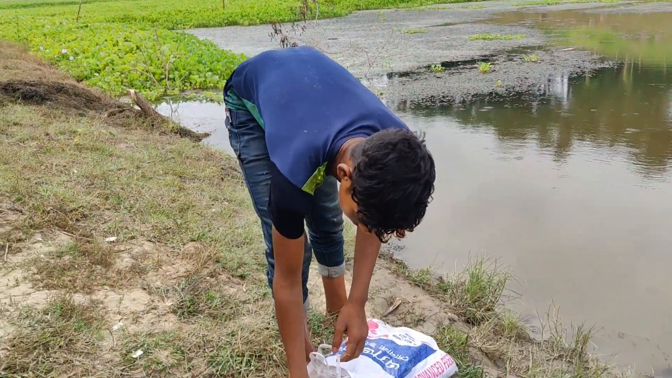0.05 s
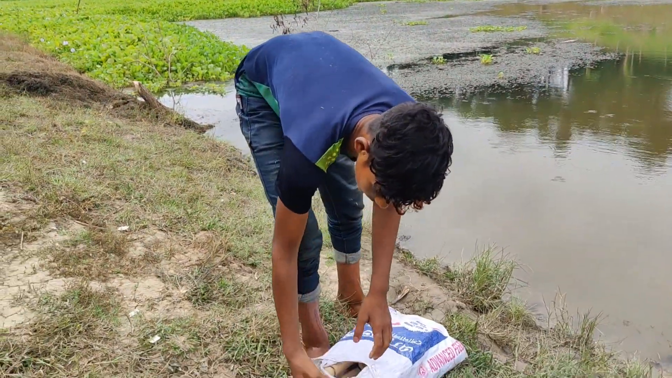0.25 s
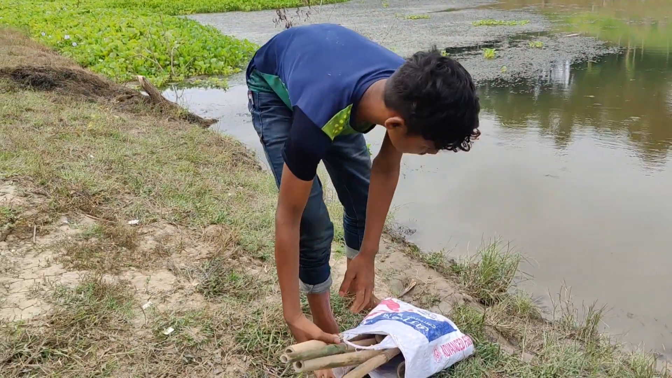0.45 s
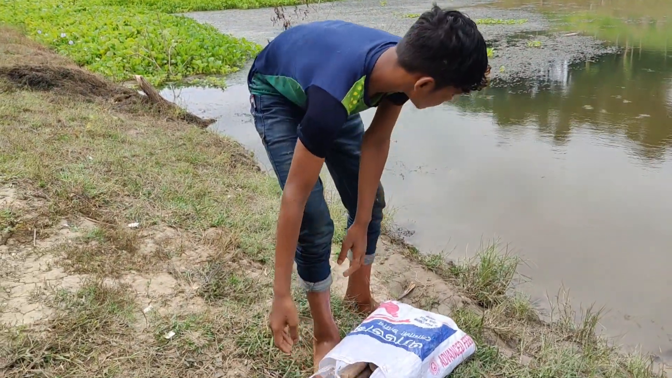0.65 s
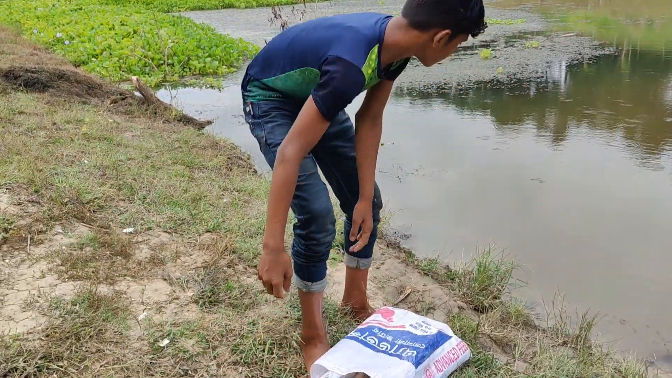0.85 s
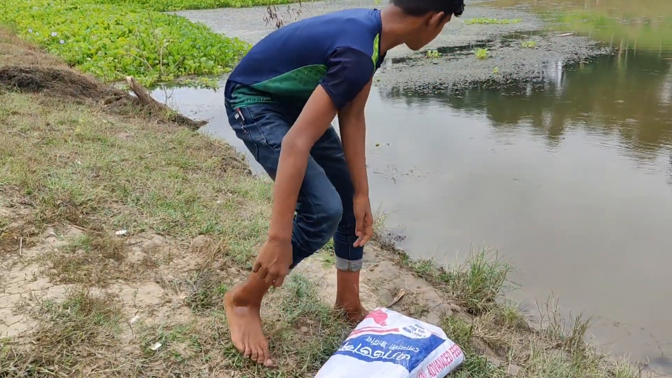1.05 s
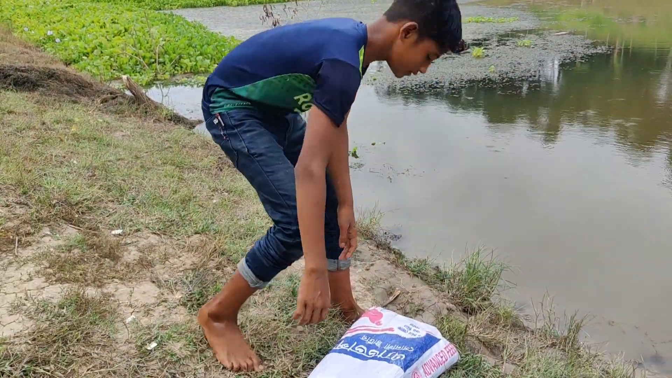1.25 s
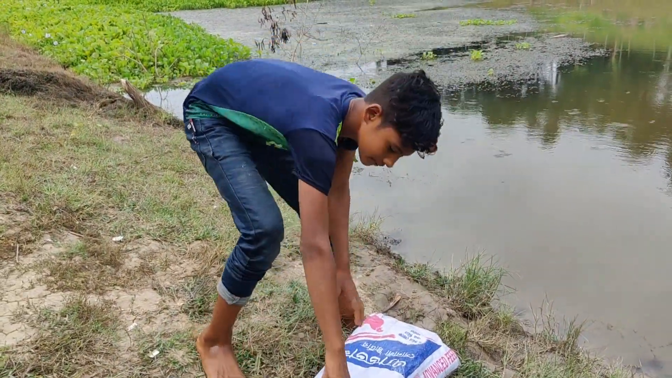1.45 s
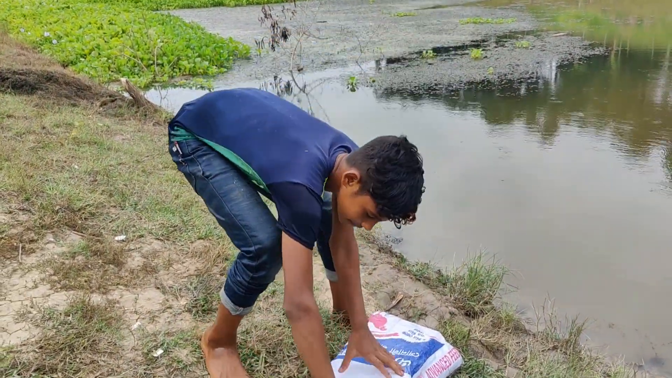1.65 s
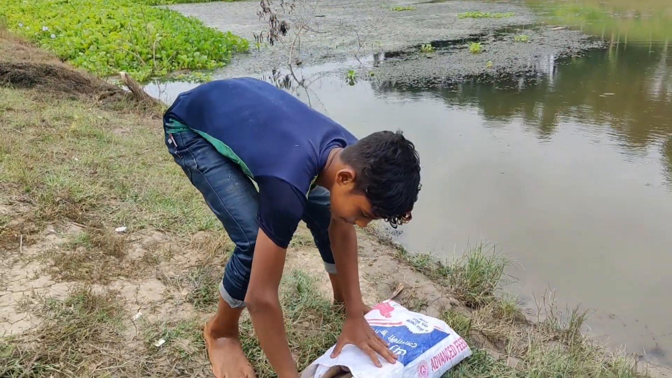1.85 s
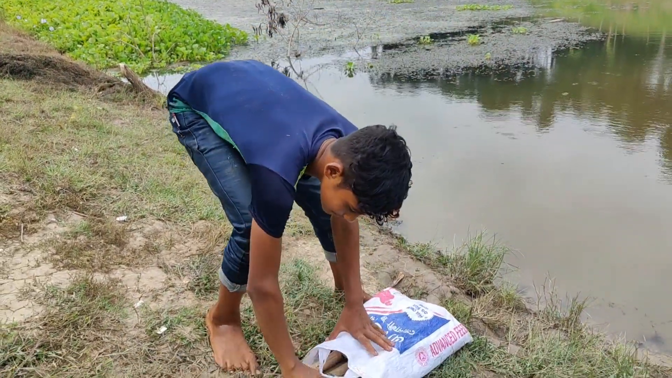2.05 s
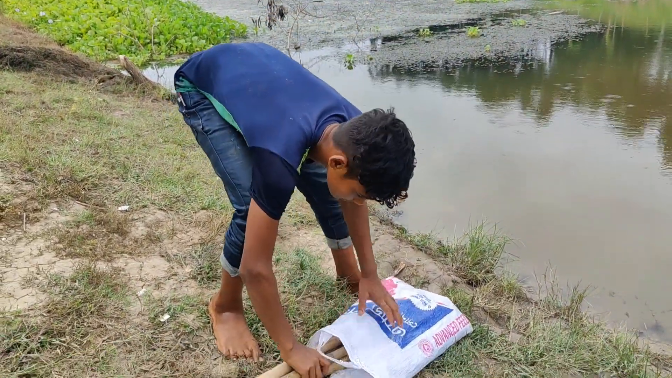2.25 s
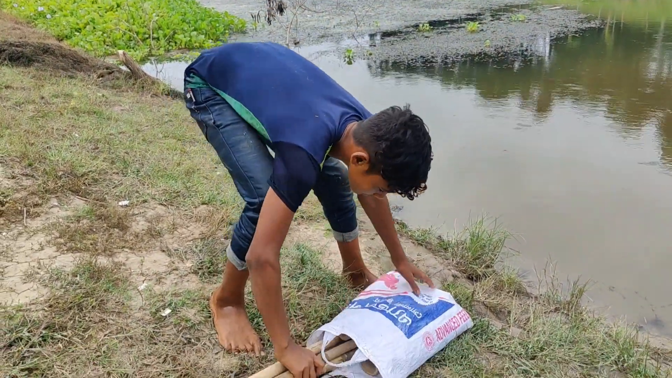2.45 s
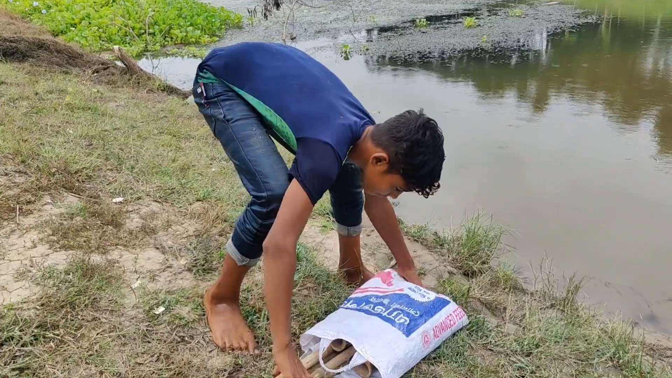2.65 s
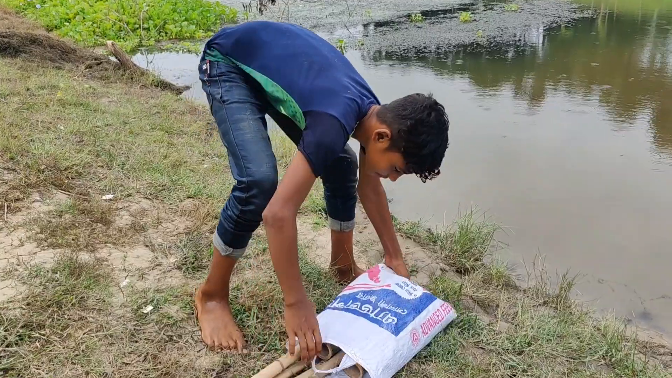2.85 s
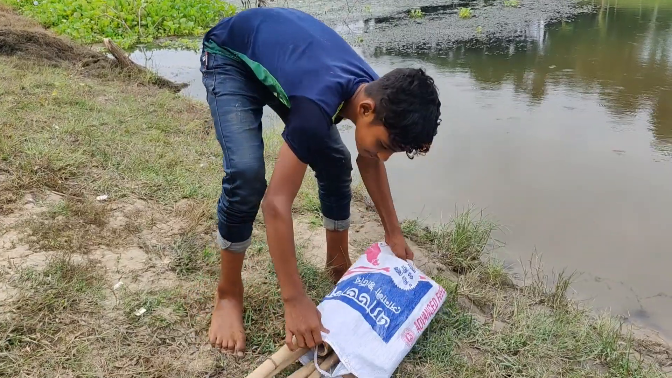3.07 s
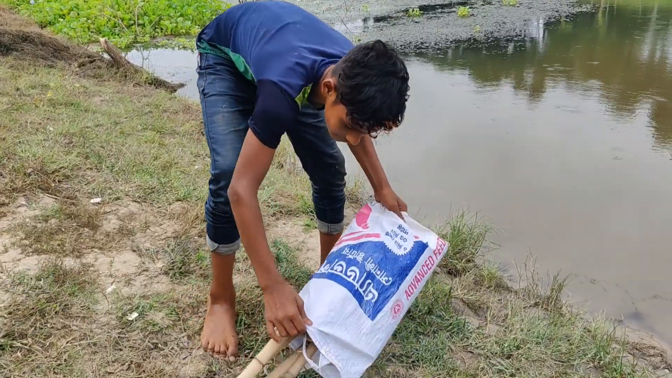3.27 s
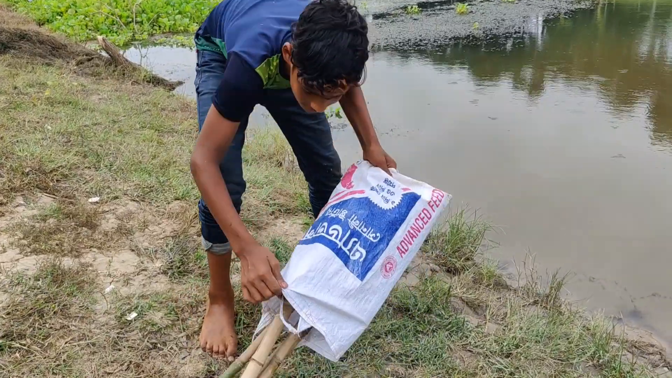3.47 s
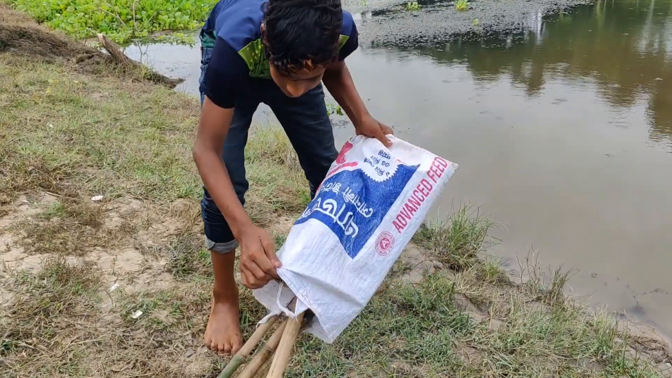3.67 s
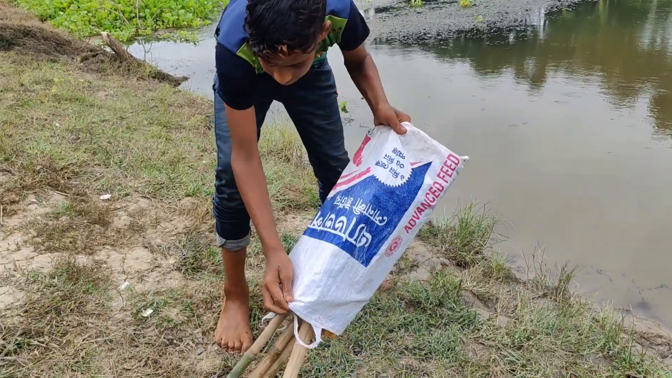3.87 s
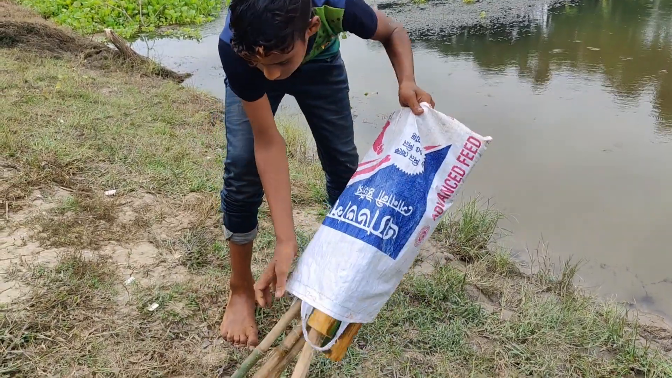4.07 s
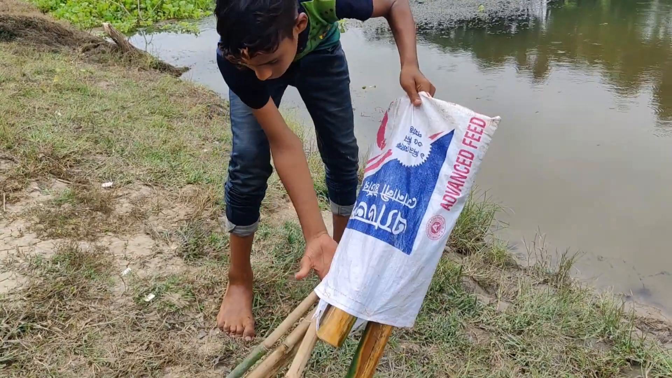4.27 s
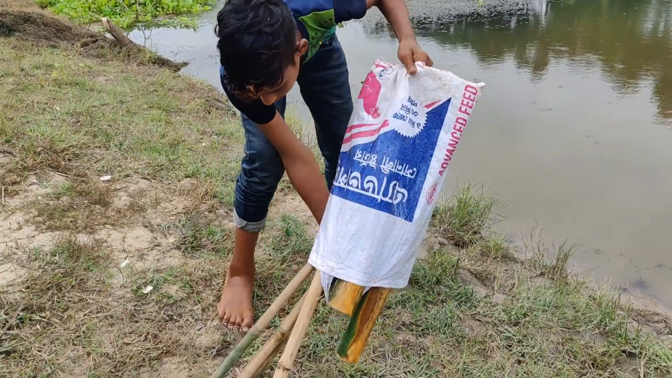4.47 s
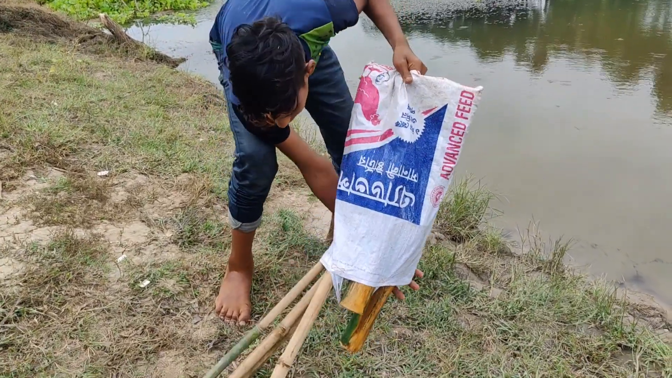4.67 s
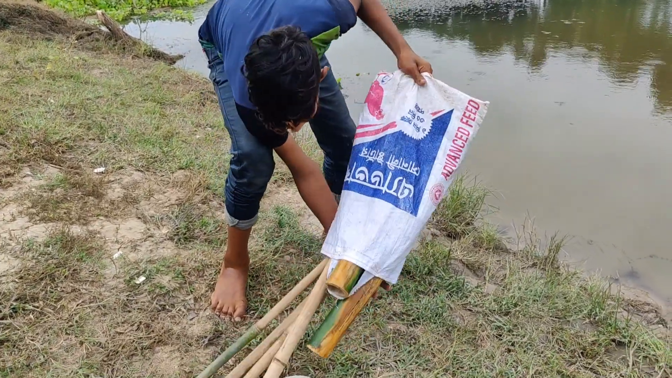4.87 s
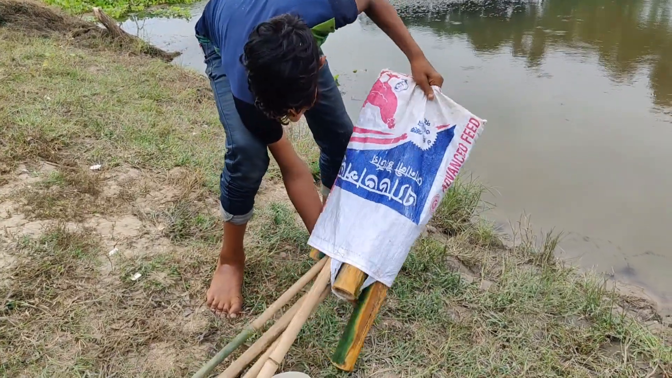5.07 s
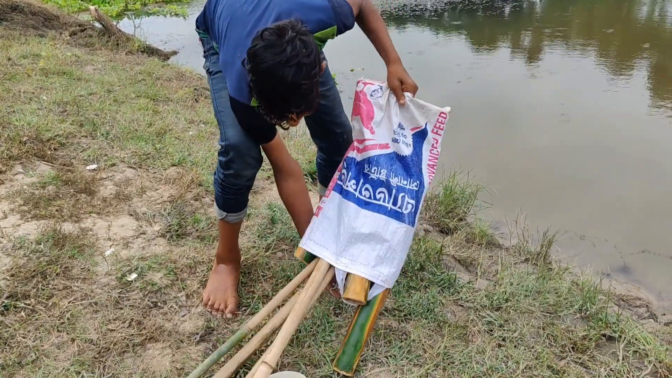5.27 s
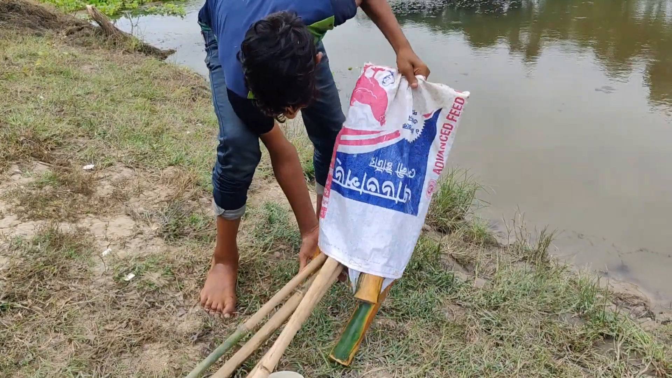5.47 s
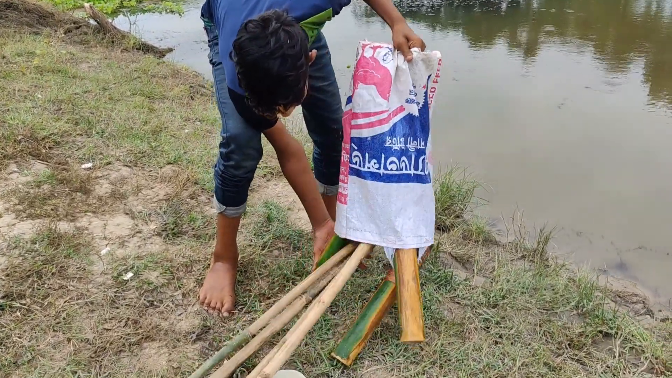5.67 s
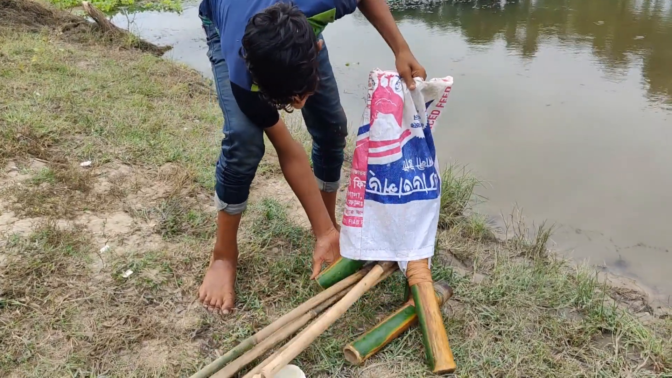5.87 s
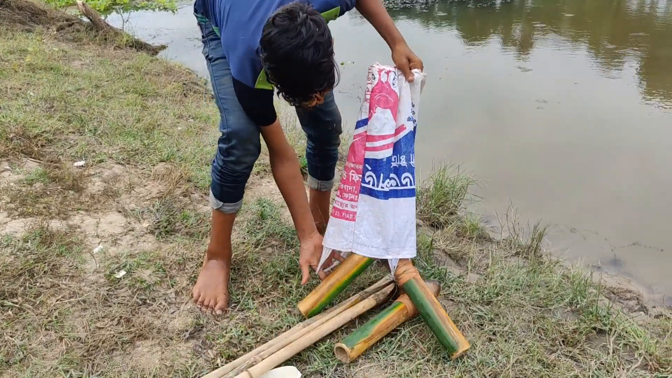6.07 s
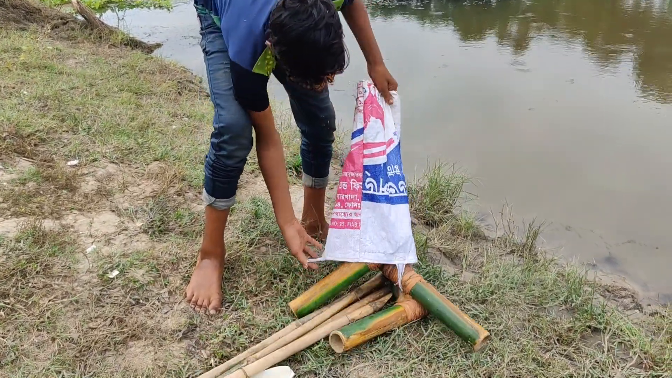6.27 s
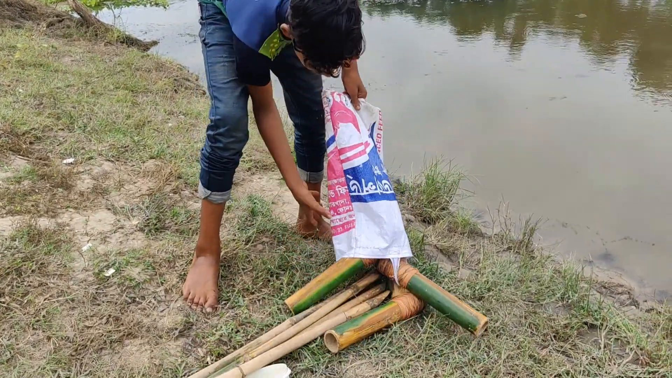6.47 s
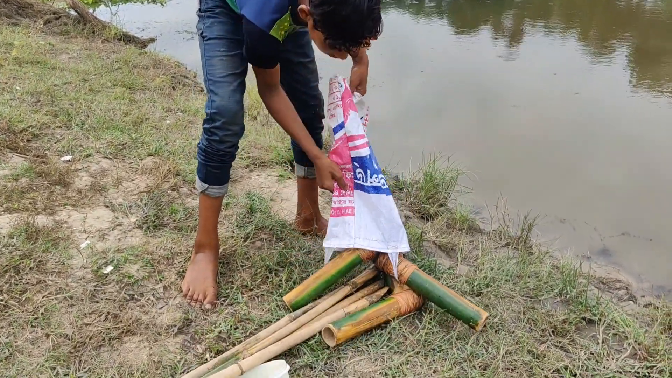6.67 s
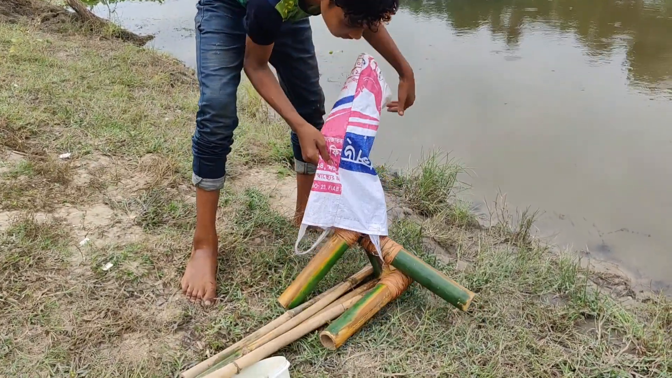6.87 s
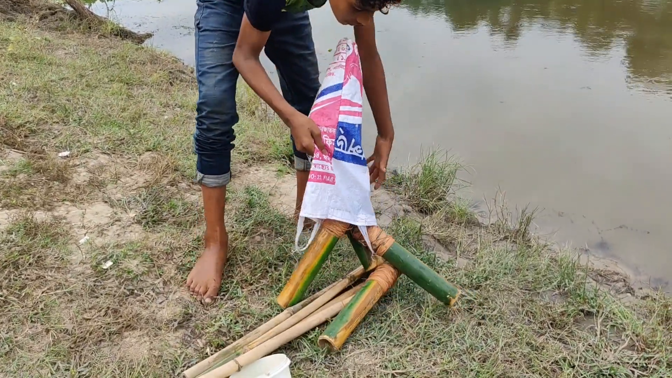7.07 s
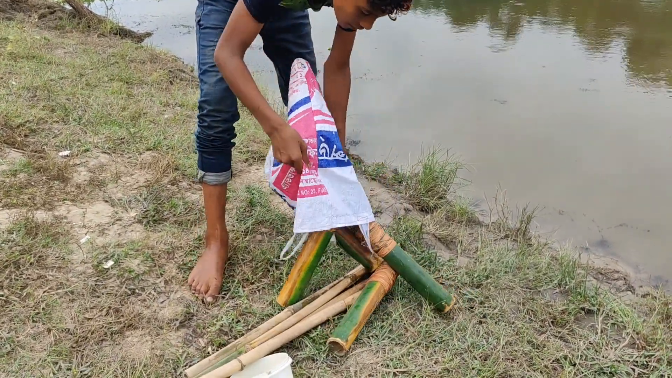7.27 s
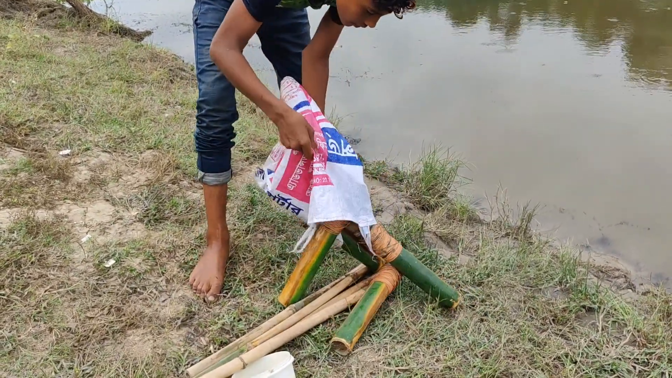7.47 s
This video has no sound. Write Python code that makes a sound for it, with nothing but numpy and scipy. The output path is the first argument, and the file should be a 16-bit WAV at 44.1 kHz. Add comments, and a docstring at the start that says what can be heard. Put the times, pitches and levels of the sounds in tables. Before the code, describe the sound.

A woven plastic sack of bamboo tubes is tugged and emptied on grass. Light taps lead to one hard, dry crack with a quick tumble of knocks, then near quiet with tiny bird calls and a wind bump. Crisp rustling returns and grows, dotted with hollow clacks, then a second fast clatter and a few last taps. Near, dry, slightly left, with steady high hiss behind.

```python
"""On a grassy bank, bamboo tubes knock together and a woven plastic sack rustles as it is handled.
Insects hiss high up and birds whistle far off; wind buffets the microphone and the load bumps the ground.
Rustle, dragging, hiss and wind are shaped noise; birds are gliding whistles.
Each knock is a short burst of noise ringing through bamboo resonances."""
import sys
import numpy as np
from scipy import signal
from scipy.fft import rfft, irfft, next_fast_len
from scipy.io import wavfile
from scipy.ndimage import uniform_filter1d, map_coordinates

SR = 44100
rng = np.random.default_rng(int(sys.argv[2]) if len(sys.argv) > 2 else 0)


def waveform_to_disk(signal):
    """Save audio, clipped to [-1, 1], as 16-bit WAV at the path in sys.argv[1]."""
    frames = np.transpose(np.atleast_2d(signal))
    scaled = np.clip(frames, -1, 1) * 32767
    samples = np.round(scaled).astype(np.int16)
    wavfile.write(sys.argv[1], SR, samples)


N = 331632

# Spectra are relative, as each sound is brought to the same power before its level is set.
# Insects and far rustling: (pitch_hz, level_db per Hz)
AIR_SPECTRUM = [(76, -38.5), (130, -23.5), (185, -13), (263, -9.5), (367, -11.5), (623, -11.5), (700, -8),
                (819, -20), (1530, -12.5), (1860, -19), (2450, -34), (4000, -16.5), (5800, -30), (9460, 5),
                (14000, -33)]
# Left-right likeness of far sounds: (pitch_hz, likeness 0-1)
FAR_LIKENESS = [(300, 1), (600, 0.5), (1200, 0), (1700, 0), (3000, 1), (5500, 0.3), (7500, 0),
                (12000, 0.42), (14000, .8)]
AIR_DB = -52.5

# Wind buffeting between gusts: (time_s, level_db)
BREEZE_LEVEL = [(0.0, -63), (1.11, -69), (1.78, -53), (2.09, -55), (2.28, -70), (3.16, -50), (3.52, -63),
                (5.03, -59), (5.28, -50), (5.68, -60.5), (6.62, -69), (7.52, -63)]
# Gusts on the microphone: (middle_s, length_s, buffeting_db, deep_surge_db)
WIND_GUSTS = [(.05, 0.17, -49, -57), (.42, 0.23, -56, -59), (.79, 0.08, -47.5, -67),
              (1.51, 0.051, -45, -48), (1.545, .04, -33.5, -48), (1.65, 0.085, -51, -40.5),
              (1.9, 0.11, -53, -50), (2.0, 0.12, -40.5, -45), (2.22, 0.13, -63, -58),
              (2.59, 0.085, -56, -45), (2.72, 0.053, -50, -60), (3.0, 0.18, -38, -49),
              (3.26, 0.18, -47, -48), (3.43, 0.072, -56, -53), (3.85, 0.23, -59, -71),
              (4.3, 0.15, -46, -62), (4.44, 0.13, -66, -49), (4.63, .1, -52.5, -59), (4.79, .12, -60, -54),
              (5.04, 0.11, -46.5, -53), (5.15, 0.052, -43, -44), (5.26, 0.076, -46.5, -52),
              (5.4, 0.18, -47.5, -51), (5.53, .1, -54, -56), (5.7, 0.15, -53, -72), (6.03, 0.15, -47, -56)]
# Low buffeting: (pitch_hz, level_db per Hz)
BUFFET_SPECTRUM = [(35, -42), (50, 4), (80, -1.5), (130, -8), (260, -18.5), (400, -48)]
# Deeper surge: (pitch_hz, level_db per Hz)
SURGE_SPECTRUM = [(10, -16), (25, 4.5), (40, 3), (55, -15), (90, -65)]
SURGE_DB = -12.5  # deep surge relative to the buffeting between gusts

# Falling bird notes: (start_s, level_db)
FALLING_NOTES = [(1.517, -53), (1.586, -55), (1.657, -53.5), (2.264, -55), (2.329, -54.5), (2.402, -56)]
# Glide of a falling note: (time_s from its start, pitch_hz, added_level_db)
FALLING_GLIDE = [(0, 1442, 1), (0.012, 1300, 6), (.021, 1030, 4), (.03, 960, 4), (.045, 930, 5)]
# Rising bird notes: (start_s, level_db)
RISING_NOTES = [(.228, -57), (.483, -64), (.99, -58), (1.236, -56), (1.497, -55.5), (1.76, -57),
                (2.026, -55.5), (2.318, -64)]
# Glide of a rising note: (time_s from its start, pitch_hz, added_level_db)
RISING_GLIDE = [(0, 3270, 0), (.014, 3200, 1.5), (.02, 3500, -11), (.027, 4000, 5.5), (.034, 4580, 0),
                (.044, 5200, -4)]
# Short low hoots: (start_s, level_db, pitch_hz, length_s)
LOW_HOOTS = [(1.406, -63, 900, 0.027), (1.43, -48.5, 515, 0.013), (1.484, -43.5, 510, 0.01),
             (1.512, -54, 546, 0.012), (1.525, -41, 560, 0.01), (1.7, -58, 520, 0.013)]

# The load bumps the ground: (start_s, level_db)
GROUND_BUMPS = [(1.535, -33), (5.32, -42), (6.02, -42), (6.73, -41), (6.91, -39), (7.352, -31)]
THUD_HZ, THUD_WIDTH_HZ, THUD_S = 150, 160, .012  # resonance, its width, fading time

# Slow stirring of the sack: (time_s, rustle_db, dragging_db)
STIRRING = [(0, -57.5, -65), (.6, -62.5, -63), (1.1, -61.5, -62), (1.4, -76.5, -76.5), (1.73, -75, -79),
            (2.1, -62.5, -64), (2.3, -63, -62), (2.45, -51.5, -56.5), (2.7, -53, -58), (2.95, -51, -47),
            (3.2, -45.5, -48.5), (3.5, -57, -50.5), (4.0, -48.5, -49), (4.7, -49, -54.5), (5.1, -49, -53.5),
            (5.45, -47, -52), (5.9, -49, -55), (6.35, -50, -50.5), (6.62, -54, -55), (6.68, -66, -66),
            (6.73, -50, -52), (7.25, -55.5, -60), (7.52, -45.5, -45.5)]
# Tugs that pull the weave taut and shift the load:
# (middle_s, length_s, rustle_db, dragging_db, sheen_db)
SACK_TUGS = [(.1, 0.26, -65, -52, -75), (.33, 0.072, -49, -46, -75), (.51, 0.15, -55.5, -52.5, -62),
             (.84, 0.16, -46, -42.5, -56), (1.24, 0.19, -65, -67.5, -67), (1.52, .15, -69, -71.5, -69),
             (1.89, 0.12, -44.5, -38, -55), (2.02, 0.085, -54, -51, -59), (2.43, 0.19, -59, -65.5, -62),
             (2.83, 0.057, -59, -52, -77), (3.3, 0.18, -56.5, -55.5, -63), (3.52, 0.15, -49.5, -78, -58),
             (3.8, 0.21, -48.5, -52, -60), (4.03, 0.18, -50, -54, -61), (4.29, 0.16, -43, -54, -54),
             (4.42, .12, -47, -45, -59), (4.59, .2, -50.5, -54.5, -50), (4.81, 0.11, -47.5, -44, -67),
             (4.96, 0.13, -55.5, -50, -59), (5.31, 0.085, -48.5, -42, -61), (5.55, 0.11, -45, -42, -64),
             (5.73, 0.19, -40.5, -42.5, -52), (6.0, 0.11, -40, -38.5, -57), (6.21, 0.17, -45.5, -38.5, -62),
             (6.5, 0.1, -53.5, -54.5, -64), (6.94, 0.13, -50, -45, -73), (7.06, 0.14, -76, -58, -59),
             (7.2, 0.12, -56.5, -58, -53), (7.4, 0.12, -46.5, -48, -65)]
# Rustling weave: (pitch_hz, level_db per Hz)
WEAVE_SPECTRUM = [(760, -32), (1300, -1), (1500, -10), (1840, -3.5), (2120, -1.5), (2370, 0.5), (2660, 3),
                  (3560, -2.5), (3900, -4.5), (5670, -14), (6870, -7.5), (7850, -6.5), (8530, -15),
                  (9500, -8), (12400, -22.5), (20900, -120)]
# Tubes dragging in the sack: (pitch_hz, level_db per Hz)
DRAG_SPECTRUM = [(71, -47), (120, -23), (183, -10.5), (243, -1.5), (383, -9.5), (616, -9.5), (782, -3.5),
                 (982, -9), (1110, -2.5), (1450, -17), (1600, -14), (2080, -21), (3520, -120)]
# The weave's brightest rustle: (pitch_hz, level_db per Hz)
SHEEN_SPECTRUM = [(6000, -25), (9000, -10), (9800, 24.5), (11500, 5.5), (13400, 12.5), (14200, -12),
                  (15700, -22)]
# Narrow hum of the air in the tubes: (pitch_hz, level_db per Hz)
HUM_SPECTRUM = [(205, -52), (238, 7.5), (253, 11), (268, -3), (310, -43.5)]
# Hum relative to the dragging: (time_s, level_db)
HUM_LEVEL = [(0, -8), (.6, -4), (.9, -12), (1.25, -4), (1.9, -16), (2.35, -5), (3.0, -16), (3.6, -5),
             (3.9, -7), (4.25, -17), (4.6, -8), (5.1, -6), (5.2, -22), (5.5, -6), (5.8, -17), (6.25, -1),
             (6.6, -13), (6.9, -15), (7.15, 2), (7.3, -14), (7.52, -11)]
# Left-right likeness of the sack's noises: (pitch_hz, likeness 0-1)
NEAR_LIKENESS = [(300, .99), (700, .9), (1150, .93), (1550, .3), (2300, .88), (3800, .75), (5200, .3),
                 (7500, .7), (11000, .98)]
# The sack lies off to the left: (pitch_hz, left_lead_radians)
SACK_LEAD = [(200, 0), (1100, .4), (2000, .1), (3500, 1.2), (7000, 0)]
SHEEN_DB = -13  # sheen relative to the slow rustle
HUM_T60 = 0.28  # seconds for the hum's level to fall by 60 dB

# Knocks: (start_s, level_db, pitch_hz of the loudest note, note_db, brightness_db)
TUBE_KNOCKS = [(.092, -34.5, 950, 15, -13), (.121, -27.5, 732, 21, -29), (.293, -32, 1100, 14, -22),
               (.323, -16.5, 865, 11.5, -13), (.342, -20, 1105, 11, -6), (.357, -26, 723, 11, -10),
               (.469, -38, 726, 10, 10), (.515, -36.5, 694, 23, -6), (.783, 2, 2120, 0, -10),
               (.793, -7.5, 420, 4, -26), (.809, -19, 1050, 8, -23), (.848, -13.5, 755, 8, -26),
               (.862, -17, 1150, 4, -26), (.872, -21, 750, 7, -24), (.883, -16, 440, 3, -20),
               (.904, -22, 940, 9, -24), (.958, -13, 1100, 2, -21), (.966, -21, 370, 8, -22),
               (1.841, -21.5, 413, 21, 7), (1.868, -21, 1130, 7, -18), (1.881, -17, 1180, 8.5, -20),
               (1.943, -27, 710, 1, -7), (1.961, -13, 976, 13, -17), (1.977, -20, 1046, 10, -13),
               (2.416, -29.5, 1050, -6, 5), (2.827, -19, 1040, 7, -3), (2.893, -29.5, 702, 21, -21),
               (2.998, -26, 2870, 7, -12), (3.323, -20, 2700, 12, -12), (3.351, -22.5, 1120, -6, -4),
               (3.561, -26, 736, 24, -5), (3.646, -18.5, 1220, 13, -9), (3.699, -25, 720, 8, -8),
               (3.777, -31, 790, 2.5, -13), (3.836, -15.5, 1105, 26, -16), (3.951, -24, 2520, 7, -19),
               (4.117, -34.5, 804, 17, -24), (4.291, -35, 2710, 6, -8), (4.76, -25, 2620, 6, 5),
               (4.798, -11, 2620, 9.5, -19), (4.943, -35, 910, 0, -5), (5.059, -27.5, 1255, 16, -11),
               (5.24, -32.5, 1270, 16, -5), (5.267, -26, 1300, 6, -14), (5.283, -31, 1240, 8, 7),
               (5.322, -21.5, 1140, 15, -20), (5.499, -25, 1130, -5, -11), (5.59, -26, 830, 4, -20),
               (5.642, -25.5, 816, 0, -16), (5.688, -24, 2200, 14, 5), (5.702, -22.5, 2170, 13, 1),
               (5.983, -26, 1100, 12, -16), (6.098, -29, 1950, 10, -9), (6.116, -24, 1980, 20, -6),
               (6.154, -21, 2500, 3, 0), (6.16, -9.5, 2760, 5.5, -1), (6.172, -15, 730, 7, -16),
               (6.196, -21, 2600, 7, -1), (6.2, -4, 4040, -5, -1), (6.207, -12.5, 402, 5, -15),
               (6.215, -16.5, 1245, 5, -22), (6.227, -15, 1090, -5, -15), (6.243, -14, 435, 3.5, -27),
               (6.263, -21.5, 2800, 13, -17), (6.282, -16, 2670, 0, -5), (6.479, -31, 2580, 5, -13),
               (6.748, -32.5, 800, 6, -13), (6.794, -25, 2600, 8, -13), (6.953, -31, 820, 2.5, -15),
               (7, -20.5, 2160, 23, 3), (7.074, -21, 2700, 15, -9), (7.171, -29.5, 1140, 3, -18),
               (7.352, -18.5, 1163, 6.5, -10), (7.4, -24.5, 1194, 14, -13)]
# Bamboo resonances before variation: (pitch_hz, width_hz before widening, level_db)
BAMBOO_RESONANCES = [(248.6, 27, -7), (422, 92, -3), (1060, 77, -1.5), (1506, 45, -5), (1865, 147, -4),
                     (2310, 410, -6.5), (2767, 90, -6), (3240, 58, -15.5), (3540, 45, -18),
                     (3880, 110, -9.5), (3950, 160, -12), (5050, 300, -20), (6490, 400, -20),
                     (7480, 500, -13)]
# "Per octave" settings count from a 1 kHz note.
# Rattle of a 0 dB knock on a 1 kHz tube; higher and softer ones are shorter.
RATTLE_S, RATTLE_S_PER_OCTAVE, RATTLE_S_PER_DB = 0.029, -0.0034, .0003
CRACK_S, CRACK_HZ = .008, 5000  # treble above this pitch fades faster
CUT_DB, CUT_DB_PER_OCTAVE = 2, 1  # cut above about 420 Hz, deeper for higher notes
LEFT_DB, LEFT_DB_PER_OCTAVE = 3, 1  # the microphone shades high notes more
LEAD_S = .00018  # how early low pitches reach the left side

TOP_HZ = 15760


def amp(db):
    """Turn decibels into a multiplier for the wave."""
    return 10 ** (np.asarray(db) / 20)


def unit(x):
    """Scale to an average power of 1."""
    return x / np.sqrt(np.mean(x ** 2) + 1e-20)


def along(points, hz):
    """Read a table of (pitch, value) points, evenly spaced by musical interval."""
    f, value = np.transpose(points)
    return np.interp(np.log(hz + 1), np.log(f + 1), value)


def curves(rows):
    """Draw one value per sample for each column after the time."""
    s, *columns = np.transpose(rows)
    return [np.interp(np.arange(N) / SR, s, column) for column in columns]


def wobble(rate):
    """A smooth random curve with this many random points a second."""
    points = rng.standard_normal(int(N * rate / SR) + 4)
    return map_coordinates(points, [np.arange(N) * rate / SR])


def swells(rows):
    """Add up smooth rises and falls in strength, one result per level column."""
    t, out = np.arange(N) / SR, 0
    for middle, length, *level_db in rows:
        shape = np.exp(-(2 * (t - middle) / length) ** 2)
        out = out + np.outer(amp(level_db), shape)
    return out


def filtered(x, response):
    """Change each pitch's strength and timing by a response."""
    padded = next_fast_len(N + SR // 2)  # room for ringing tails
    spectrum = rfft(x, padded) * response(np.fft.rfftfreq(padded, 1 / SR))
    return irfft(spectrum, padded)[..., :N]


def spread(pair, spectrum, alike):
    """Colour two unrelated signals and mix them into stereo with the wanted likeness."""
    def middle_and_side(hz):
        turn = np.arccos(np.clip(along(alike, hz), -1, 1)) / 2
        return amp(along(spectrum, hz)) * [np.cos(turn), np.sin(turn)]

    mid, side = filtered(pair, middle_and_side)
    return unit(np.array([mid + side, mid - side]))


def patchy(pair, size, depth_db):
    """Make random patches of time and pitch louder or fainter."""
    z = signal.stft(pair, nperseg=size)[2]
    field = uniform_filter1d(rng.standard_normal(z.shape[1:]), size=4, axis=0)
    field = uniform_filter1d(field, size=5, axis=1)
    return signal.istft(z * amp(depth_db * unit(field)), nperseg=size)[1][:, :N]


def crackle(rate, spread_db, share):
    """Two draws of noise sharing short snaps of random size, with uneven colour."""
    snaps = (rng.random(N) < rate / SR) * amp(spread_db * rng.standard_normal(N))
    tails = signal.lfilter([1], [1, -np.exp(-1 / (0.0011 * SR))], snaps)  # fade within milliseconds
    share = np.clip(share, 0, 1)
    strength = np.sqrt(1 - share + share * unit(tails) ** 2)
    return patchy(rng.standard_normal((2, N)) * strength, size=256, depth_db=2.3)


def air():
    """Insects and far rustling: many tiny sounds blur into slightly uneven noise."""
    hiss = patchy(rng.standard_normal((2, N)), size=1024, depth_db=0.6)
    return amp(AIR_DB) * spread(hiss, AIR_SPECTRUM, FAR_LIKENESS)


def wind():
    """Moving air gives lumpy low buffeting and a deeper surge, almost alike on both sides."""
    breeze_db, = curves(BREEZE_LEVEL)
    buffet, surge = swells(WIND_GUSTS) + amp([breeze_db, breeze_db + SURGE_DB])
    lumpy = rng.standard_normal((2, N)) * amp(2 * wobble(25))
    buffeting = buffet * spread(lumpy, BUFFET_SPECTRUM, [(30, .988)])
    return buffeting + surge * spread(rng.standard_normal((2, N)), SURGE_SPECTRUM, [(30, 1.0)])


def sing(out, s, db, hz):
    """Add a whistle: a sine wave with a slightly hoarse strength and soft ends."""
    hoarse = 1 + 0.19 * uniform_filter1d(rng.standard_normal(len(hz)), size=60) * np.sqrt(60)
    wave = np.sin(2 * np.pi * np.cumsum(hz) / SR)
    tone = amp(db) * hoarse * np.hanning(len(hz)) ** .5 * wave
    start = round(s * SR)
    return out + np.pad(tone, (start, N - start - len(hz)))


def birds():
    """Falling and rising whistles and low hoots, each with a short blurred echo."""
    out = np.zeros(N)
    for notes, glide in ((FALLING_NOTES, FALLING_GLIDE), (RISING_NOTES, RISING_GLIDE)):
        s, hz, level = np.transpose(glide)
        t = np.arange(0, s[-1], 1 / SR)
        for start, db in notes:
            pitch = np.interp(t, s, hz) * (1 + 0.01 * rng.standard_normal())
            out = sing(out, start, db + np.interp(t, s, level), pitch)
    for start, db, hz, length in LOW_HOOTS:
        out = sing(out, start, db, np.full(int(length * SR), hz))
    fade = amp(-60 * np.arange(SR // 5) / SR / 0.13)  # falls 60 dB in 0.13 s
    echo = rng.standard_normal((2, SR // 5)) * fade
    echo = echo / np.linalg.norm(echo[0])
    return out + amp(-0.5) * signal.fftconvolve(out[None], echo, axes=1)[:, :N]


def thuds():
    """A dying push of noise passes through one broad low resonance of the ground."""
    push, t = np.zeros(N + SR), np.arange(SR // 10) / SR
    for s, db in GROUND_BUMPS:
        burst = np.exp(-t / THUD_S) * rng.standard_normal(len(t))
        push[round(s * SR):][:len(t)] += amp(db) * burst

    def ground(f):
        width = 1j * f * THUD_WIDTH_HZ
        return (width / (THUD_HZ ** 2 - f * f + width)) ** 2

    return filtered(push[:N], ground) * np.sqrt(SR / THUD_WIDTH_HZ / 2)


def sack():
    """Plastic strands slip and snap; the tubes drag inside and the air in them hums."""
    rustle_db, drag_db = curves(STIRRING)
    stirring = amp([rustle_db, drag_db, rustle_db + SHEEN_DB])
    rustle, dragging, shine = swells(SACK_TUGS) + stirring
    keep = amp(-60 / (HUM_T60 * SR))
    lingering = signal.lfilter([1 - keep], [1, -keep], dragging)  # the hum builds and fades slowly
    humming = amp(curves(HUM_LEVEL)[0]) * lingering
    clump = 1.6 * wobble(40)  # slips come in bunches, in dB

    weave_noise = spread(crackle(400, 5.5, share=0.32), WEAVE_SPECTRUM, NEAR_LIKENESS)
    drag_noise = spread(crackle(120, 2.4, share=0.33), DRAG_SPECTRUM, NEAR_LIKENESS)
    sheen_noise = spread(crackle(340, 5, share=0.2), SHEEN_SPECTRUM, NEAR_LIKENESS)
    hum_noise = spread(rng.standard_normal((2, N)), HUM_SPECTRUM, NEAR_LIKENESS)

    weave = rustle * amp(clump) * weave_noise
    drag = dragging * amp(clump + wobble(26)) * drag_noise
    sheen = shine * amp(0.32 * clump) * sheen_noise
    hum = humming * amp(3 * wobble(12)) * hum_noise
    near = (weave + drag + sheen) * amp([[.7], [-.7]]) + hum  # left a little louder, in dB
    return filtered(near, lambda hz: np.exp(.5j * np.outer([1, -1], along(SACK_LEAD, hz))))


def tubes():
    """Each knock is a dying rattle of contacts through woody resonances and the struck tube's note."""
    out, size = np.zeros((2, N + SR)), 8192
    t, f = np.arange(size) / SR, np.fft.rfftfreq(size, 1 / SR)

    def ring(hz, width):
        """A resonance: pitches close to hz pass most strongly."""
        return 1j * f * width / (hz * hz - f * f + 1j * f * width)

    def shelf(db, hz):
        """Raise or lower the pitches above hz."""
        return (1 + amp(db) * 1j * f / hz) / (1 + 1j * f / hz)

    hz, width, level = np.transpose(BAMBOO_RESONANCES)[:, :, None]
    sign = (-1) ** np.arange(len(hz))[:, None]
    delay = LEAD_S / np.hypot(1, f / 1900)  # shorter for high pitches
    lag = np.array([np.ones_like(f), np.exp(-2j * np.pi * f * delay)])
    dull = 1 / (1 + (f / CRACK_HZ) ** 4)
    apart = .45 * f ** 2 / (f ** 2 + 2500 ** 2)  # the sides differ mostly in the treble
    shading = f ** 2 / (f ** 2 + 350 ** 2)  # the microphone's body shades all but the bass

    for s, db, note_hz, note_db, bright_db in TUBE_KNOCKS:
        octave = np.log2(note_hz / 1000)
        length = RATTLE_S + RATTLE_S_PER_OCTAVE * octave + RATTLE_S_PER_DB * db
        cut_db = CUT_DB + CUT_DB_PER_OCTAVE * octave
        pan_db = LEFT_DB + LEFT_DB_PER_OCTAVE * octave

        pitch = hz * (1 + 0.029 * rng.standard_normal(hz.shape))  # no two tubes are cut alike
        strength = sign * amp(level + rng.normal(0, 2.5, hz.shape))
        wood = (strength * ring(pitch, 1.2 * width)).sum(0)
        wood = wood + amp(-13.5) * ring(960, 2500)
        note = amp(note_db) * ring(note_hz, 14 + 16 * (note_hz / 1000) ** 2)
        note = note * ring(note_hz, 500)  # softens the start of the note
        colour = shelf(bright_db + 8.5, 1500) / shelf(cut_db, 420) / (1 + 1j * f / 9000) ** 2

        attack = (1 - np.exp(-t / 0.00027)) * (1 + 0.77 * np.exp(-t / 0.00095))
        shape = attack * amp(-25 * t / np.clip(length, .003, .08))  # down 25 dB after length
        lumps = np.abs(np.repeat(rng.standard_normal(size // 64), 64)) ** .5 + .5  # uneven contacts
        rattle = rng.standard_normal((3, size)) * shape * lumps
        crack = rfft(rattle * np.exp(-t / CRACK_S))
        noise = dull * rfft(rattle) + (1 - dull) * 1.4 * crack

        shade = amp(np.outer([.5, -.5], pan_db * shading))
        woody = (noise[0] + apart * noise[1:]) * wood
        ringing = 1.5 * np.linalg.norm(shape) * note
        blow = irfft((woody + ringing) * colour * lag * shade, size)
        start_strength = np.sqrt(np.mean(blow[:, :350] ** 2))  # over the first 8 ms
        out[:, round(s * SR):][:, :size] += blow * amp(db - 12.5) / start_strength
    return out[:, :N]


def scene():
    """Far insects, wind and birds surround the near thuds, sack and knocking tubes."""
    return air() + wind() + birds() + thuds() + sack() + tubes()


def record(dry):
    """Round off the loudest peaks and remove everything above the top pitch."""
    rounded = dry / (1 + np.abs(dry / .95) ** 6) ** (1 / 6)
    return filtered(rounded, lambda hz: hz < TOP_HZ)


dry = scene()
out = record(dry)
waveform_to_disk(out)
```